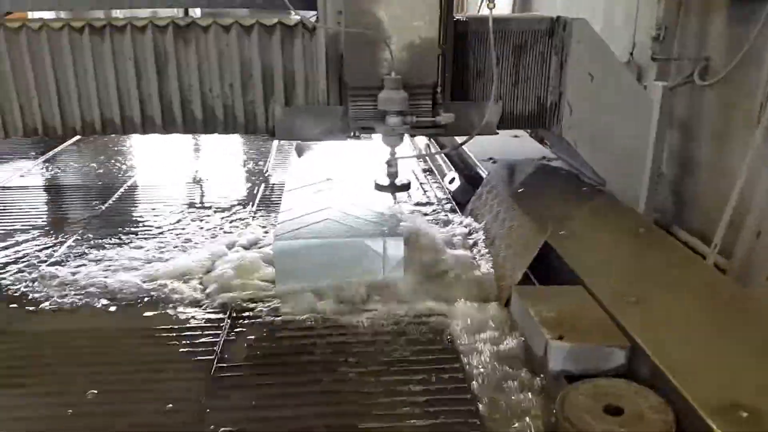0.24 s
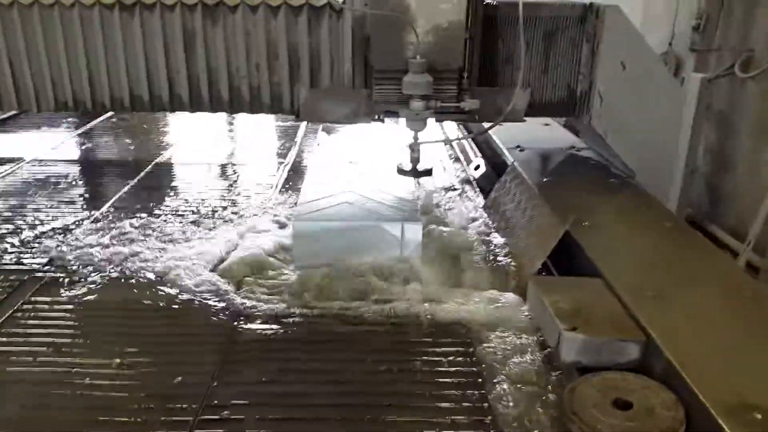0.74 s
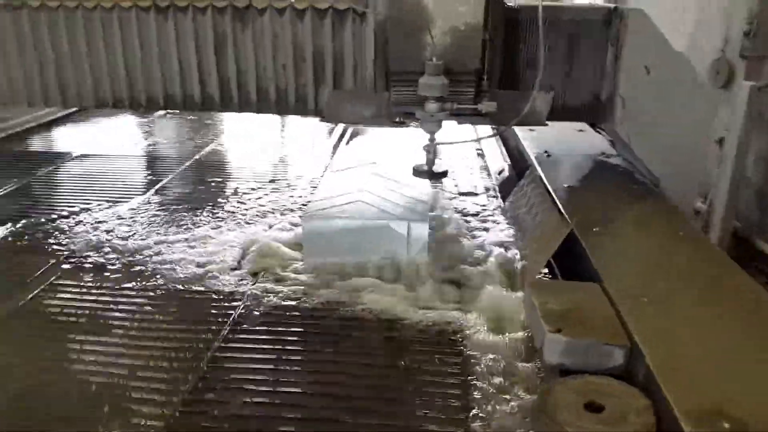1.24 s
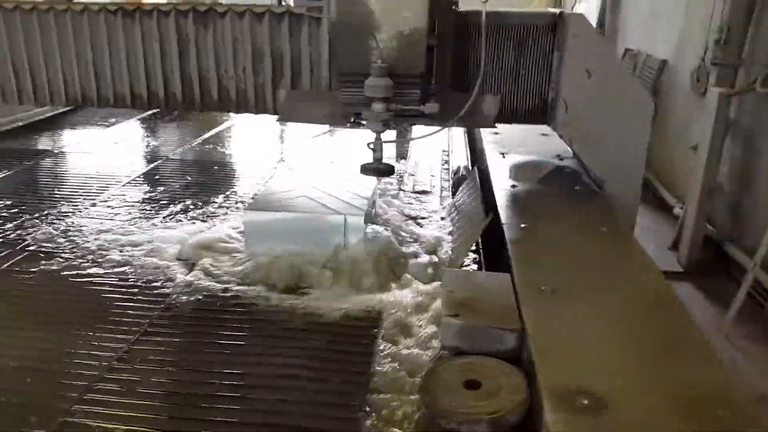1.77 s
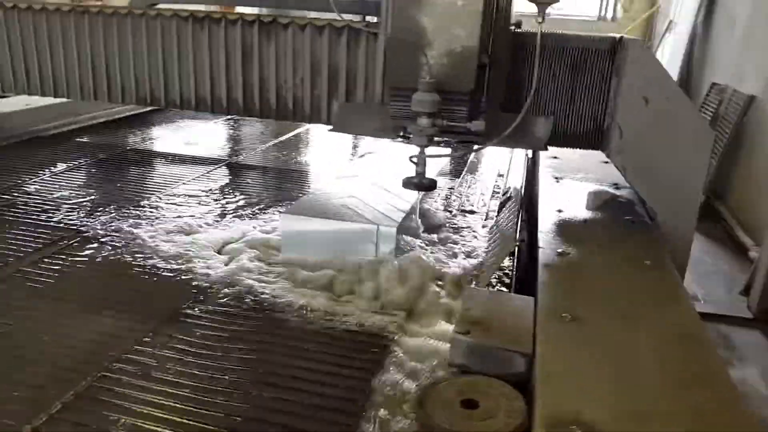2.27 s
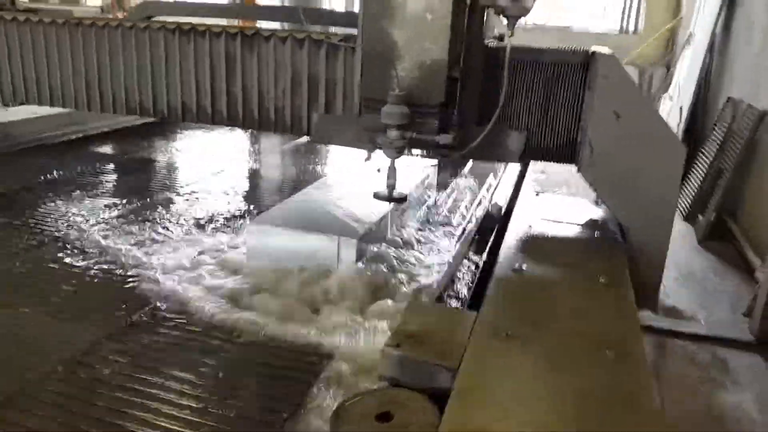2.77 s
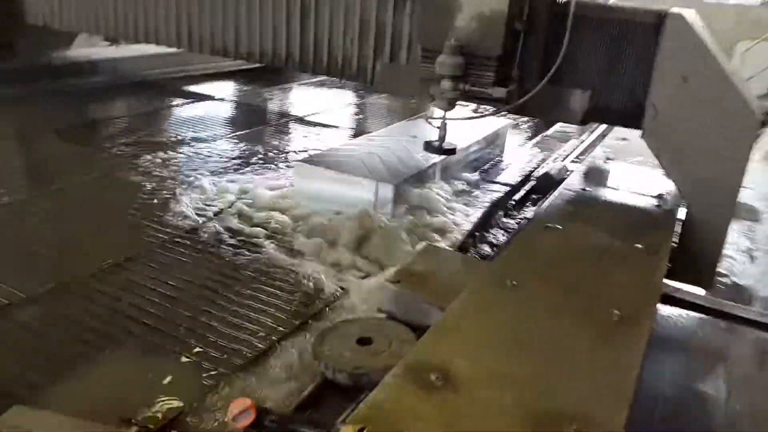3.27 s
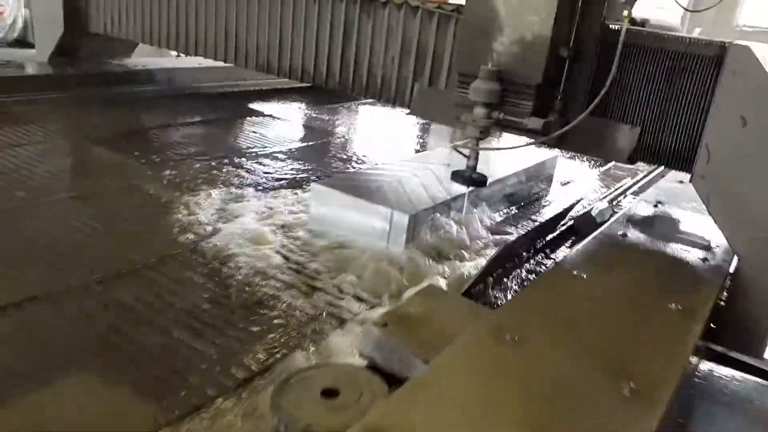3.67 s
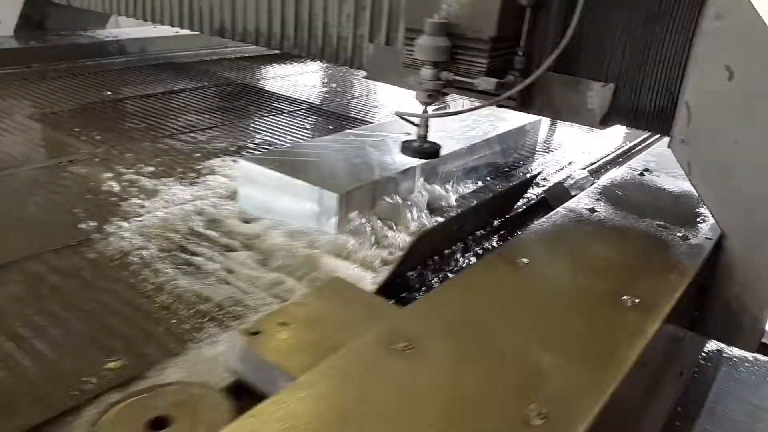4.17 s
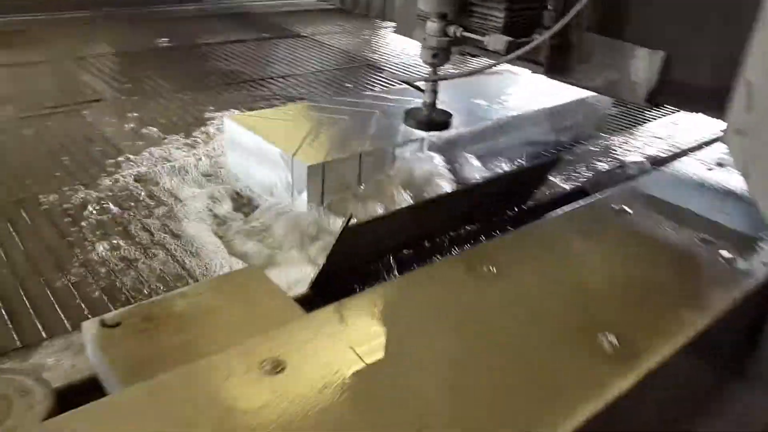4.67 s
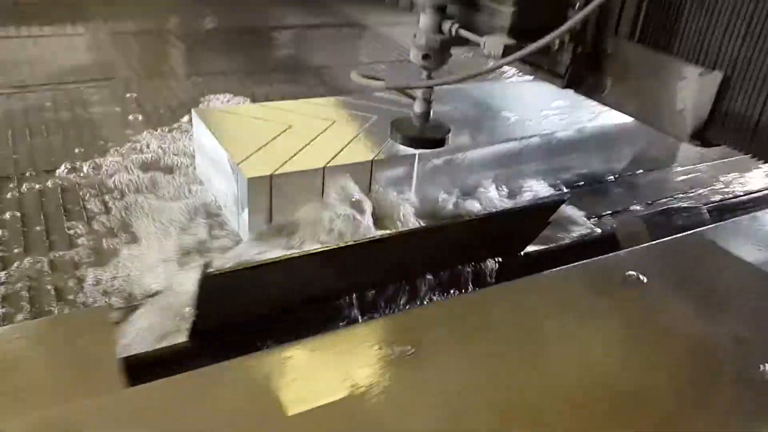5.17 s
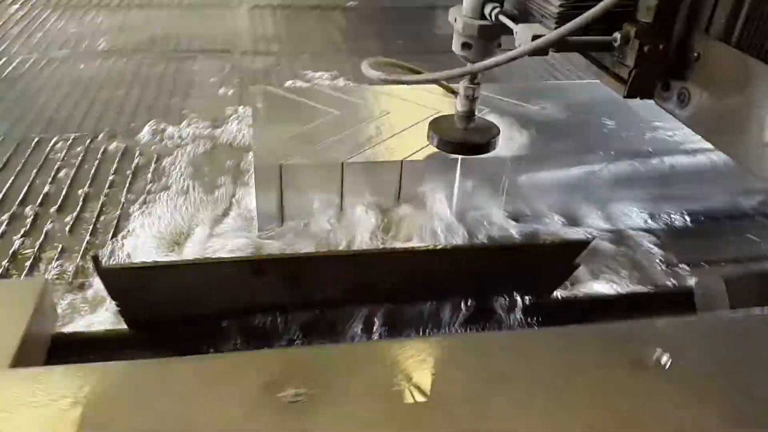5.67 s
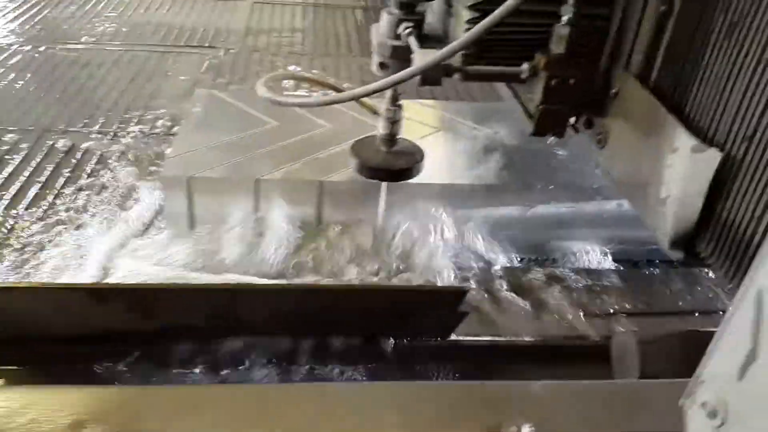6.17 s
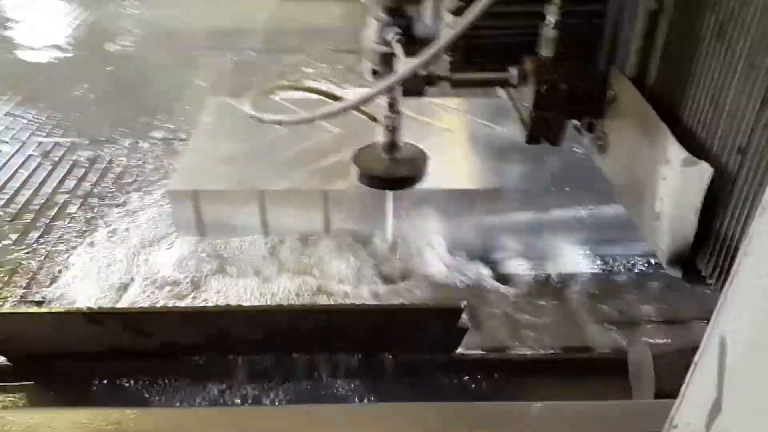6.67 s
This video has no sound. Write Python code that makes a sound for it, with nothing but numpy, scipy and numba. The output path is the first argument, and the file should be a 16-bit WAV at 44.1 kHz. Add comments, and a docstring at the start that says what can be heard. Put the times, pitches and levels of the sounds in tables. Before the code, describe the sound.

A bright, steady high-pressure waterjet hiss with bubbling froth, as air gusts thump the left microphone and later roar over both.

```python
"""First comes the bright hiss of an abrasive waterjet in a thick metal block, with a breathy tone from the cut.
The hiss is noise in flickering bands; the tone is noise in the slot's resonances; the tank's froth is ringing bubbles.
The listener walks from the tank's edge to the nozzle with a pair of microphone ports. Gusts and single eddies,
made of short pressure pulls, strike mostly the left port; then air rushes over both ports in a brighter roar.
The workshop behind is a faint low rumble."""
import sys
import numpy as np
from scipy import signal
from scipy.io import wavfile
from scipy.ndimage import uniform_filter1d, minimum_filter1d, map_coordinates
from numba import njit

SR = 44100
rng = np.random.default_rng(int(sys.argv[2]) if len(sys.argv) > 2 else 0)


def put_to_file(sound):
    """Save the sound as 16-bit audio at rate SR, in the file named by the first command-line argument."""
    columns = np.atleast_2d(sound).T  # one column per channel
    safe = np.clip(columns, -1, 1)
    whole_steps = np.round(safe * 32767)
    wavfile.write(sys.argv[1], SR, whole_steps.astype(np.int16))


N = 304731

# Relative colour of the hiss at the tank's edge: (frequency [Hz], left density [dB per Hz], right density [dB per Hz])
HISS_AT_TANK_EDGE = [(120, -29, -31), (406, -1.5, -7.5), (900, -11, -9.5), (1800, -1, -6), (2870, -5, -2.5),
                     (3930, -2, -1.3), (4480, -4, 6), (6200, -0.5, 6.5), (8330, 13, 2.5), (9650, 4.2, 7),
                     (10900, 11.5, -9.5), (12660, -4, 1), (14500, -4.5, -9), (15500, -7, -2)]
# The same beside the nozzle: (frequency [Hz], left density [dB per Hz], right density [dB per Hz])
HISS_BESIDE_NOZZLE = [(120, 10, -11), (400, -7.5, -5), (900, -5, -8.5), (1800, 2, -6.0), (2960, 5, -0.5),
                      (3700, -2.5, 0.5), (4830, -4.5, 4), (6070, -4.5, -1.5), (7970, 0.1, 0.7),
                      (8900, -4, 0.5), (10900, 0.5, -1), (11900, 8.5, 4), (13200, 7.5, -2), (16700, -6, 3)]
# Strength of the hiss: (time [s], level [dB])
HISS_LEVEL = [(0, -14.5), (.7, -12.5), (2.2, -12), (3.9, -13.5), (5.3, -13.5), (5.55, -15), (5.8, -14.5),
              (6.9, -15.5)]
# The walk towards the nozzle: (time [s], nearness [0 tank edge - 1 nozzle])
WALK = [(0, 0.42), (.8, 0.41), (2.4, 0.36), (4.2, 0.52), (4.9, 0.62), (6.2, 0.78), (6.9, 0.83)]
# Direction of the nozzle: (time [s], lag of the left port [s])
NOZZLE_BEARING = [(0, .00001), (1.6, .000055), (5.9, .00006), (6.6, .00001)]
# Air resonances of the cut slot: (frequency [Hz], width [Hz], relative level [dB])
SLOT_RESONANCES = [(1900, 580, -7.5), (6010, 540, -3)]
# How strongly the jet blows those resonances: (time [s], level [dB])
SLOT_LEVEL = [(0, -23), (.25, -18.5), (.42, -24.5), (.8, -31), (1.1, -30), (2.2, -30), (2.7, -42),
              (6.9, -49)]
# Surges of froth, about three a second, each pushing a gust at one port:
# (start [s], length [s], swell of the splash [dB], rumble of the gust [dB], port [0 left, 1 right])
FROTH_SURGES = [(0.152, .14, 4.5, -30.5, 0), (.54, .1, 3, -35, 0), (.75, .13, 2.5, -29.5, 0),
                (1.182, .14, 3, -25.5, 0), (1.377, .2, 0, -22, 0), (1.798, 0.11, 2.5, -20, 0),
                (2.0, 0.096, 0, -25, 0), (2.232, .1, 2.5, -24.5, 0), (2.449, 0.11, 2.5, -21, 0),
                (2.647, 0.076, -0.5, -19.5, 0), (2.836, 0.06, -0.5, -24, 0), (3.13, .1, 2.5, -22.5, 0),
                (3.278, .11, 3, -21, 0), (3.464, .03, -2.5, -25.5, 0), (3.65, .11, 0, -23.5, 0),
                (3.807, 0.12, 1.5, -18.5, 0), (4.116, 0.18, 3.5, -20, 0), (4.357, .19, 0, -18, 0),
                (4.708, 0.14, 1, -19.5, 0), (5.16, .06, 3, -26, 1), (5.29, 0.062, 5, -21, 1),
                (5.43, 0.065, 3.5, -27.5, 1), (6.06, .14, 4.5, -23, 1)]
# Rumble between gusts: [left [dB], right [dB]]
CALM_RUMBLE_DB = [-34.5, -41.5]
# Air speed beside the nozzle, as eddy rates: (time [s], left rate [Hz], right rate [Hz])
STREAM_EDDY_RATES = [(5.07, 560, 400), (5.14, 1100, 430), (5.55, 900, 490), (5.8, 1330, 533),
                     (6.17, 1900, 1540), (6.48, 1900, 1500), (6.62, 1046, 650), (6.76, 1800, 1800),
                     (6.9, 2180, 1900)]
# Single large eddies that thump a port: (time [s], peak level [dB], port [0 left, 1 right])
LARGE_EDDIES = [(.22, -10.5, 0), (.429, -9, 0), (.642, -12.5, 0), (0.777, -10.5, 0), (1.199, -11.5, 0),
                (1.288, -8, 0), (1.388, -5, 0), (1.432, -7, 0), (1.553, -14, 0), (2.008, -8, 0),
                (2.323, -15, 0), (2.365, -9, 0), (2.46, -10, 0), (2.707, -10, 0), (2.882, -9, 0),
                (2.934, -6.5, 0), (2.957, -4, 0), (3.066, -10, 0), (3.295, -8, 0), (3.38, -8, 0),
                (3.469, -9, 0), (3.705, -10, 0), (3.885, -15, 1), (4.231, -8.5, 1), (4.483, -11, 1),
                (4.525, -11, 1), (5.08, -4, 0), (5.147, -17, 1), (5.31, -15, 1)]

# Random level changes in each band of the hiss, slow to fast
WANDER_DB, PATCHY_DB, SPUTTER_DB = .5, 1.1, .55
SURGE_SHARE = .7    # share of the splash swell, in dB, that reaches the lowest hiss
DIRECT_SHARE = .22  # share of hiss power that takes the straight path
FROTH_DB, FROTH_RIGHT_DB, BUBBLES_PER_S = -25, -6.5, 2500   # the right side is relative to the left
FROTH_LOW_HZ, FROTH_HIGH_HZ = 712, 4090
USUAL_SPLASH_DB, SWELL_SPREAD_S = -3, .042   # a swell reaches this far beyond its gust
GUST_ATTACK_S, GUST_RELEASE_S = .042, .05    # time to rise and to fall by 10 dB
GUST_EDDY_HZ, GUST_REFERENCE_DB = 490, -19.5  # eddy rate of a gust at this level
EDDY_FOLLOWS = .5   # share of the gust's swing, in dB, that the eddy rate follows
# Steady air beside the nozzle, [left, right]; the level is that of slow air
STREAM_ENTRY_S, STREAM_DB = [5.1, 5.64], [-17.5, -18]
STREAM_THINS_HZ, STREAM_SPLASH_DB = 1670, 3  # faster eddies rumble less; the nearby splash is louder
LOW_CUT_HZ, PORT_TOP_HZ, PORT_LEAK_DB = 88, 3470, -37
HALL_DB, HALL_BAND_HZ = -52, [65, 240]
CUTOFF_HZ = 15850


def from_db(db):
    """Decibels to amplitude gain."""
    return 10 ** (np.asarray(db) / 20)


def rms_one(x):
    """Scale to rms 1."""
    return x / np.sqrt(np.mean(x ** 2) + 1e-20)


def in_time(rows):
    """Each column of a curve, read at every sample."""
    times, *columns = np.transpose(rows)
    return [np.interp(np.arange(N) / SR, times, column) for column in columns]


def at_hz(rows, hz):
    """Each column of a spectrum at one frequency, as a column vector."""
    points, *columns = np.transpose(rows)
    return np.array([[np.interp(np.log(hz), np.log(points), column)] for column in columns])


def butter(x, hz, kind, order=2):
    """Causal Butterworth filter."""
    sections = signal.butter(order, np.clip(hz, 10, .45 * SR), kind, fs=SR, output="sos")
    return signal.sosfilt(sections, x + 1e-18)


def drift(rate_hz):
    """Slow random curve with rms 1: low-passed noise, computed at every 40th sample."""
    r = np.exp(-80 * np.pi * rate_hz / SR)
    noise = rng.standard_normal(N // 40 + 2002)
    slow = signal.lfilter([1], [1, -2 * r, r * r], noise)[2000:]   # drop the filter's start
    return np.interp(np.arange(N) / 40, np.arange(len(slow)), rms_one(slow))


def resonance(x, hz, width_hz):
    """Two-pole resonance with gain 1 on top."""
    r = np.exp(-np.pi * width_hz / SR)
    zeros = np.array([1, 0, -1]) * (1 - r * r) / 2
    poles = [1, -2 * r * np.cos(2 * np.pi * hz / SR), r * r]
    return signal.lfilter(zeros, poles, x + 1e-18)


@njit
def smear(x, keep):
    """One-pole low-pass whose memory changes from sample to sample."""
    out, state = np.empty(len(x)), 0.
    for i in range(len(x)):
        state = keep[i] * state + (1 - keep[i]) * x[i]
        out[i] = state
    return out


def delayed(x, lag_s):
    """Sound arriving late by a lag that may change with distance."""
    return map_coordinates(x, [np.arange(N) - lag_s * SR], order=3, mode="mirror")


def jet(surge_db, spray_top_hz=5000):
    """Turbulent hiss: noise bands that flicker, with a colour that changes on the way to the nozzle."""
    (level_db,), (near,) = in_time(HISS_LEVEL), in_time(WALK)
    edges = np.geomspace(1260, 17700, 25) - 1200
    direct, diffuse = 0, 0
    for low, high in zip(edges, edges[1:]):
        hz = np.sqrt(low * high)
        noise = butter(rng.standard_normal((3, N)), [low, high], "band")
        colour_db = (1 - near) * at_hz(HISS_AT_TANK_EDGE, hz) + near * at_hz(HISS_BESIDE_NOZZLE, hz)
        # the lower bands are spray hitting the water, and swell with the froth
        spray_db = SURGE_SHARE * surge_db / (1 + (hz / spray_top_hz) ** 2)
        flicker_db = WANDER_DB * drift(3.4) + PATCHY_DB * drift(13) + SPUTTER_DB * drift(32)
        gain = from_db(colour_db + spray_db + flicker_db)
        direct = direct + gain * noise[0]
        diffuse = diffuse + gain * noise[1:]
    # the straight path is shared by both ports; the rest comes from all over the workshop
    left_lag_s = in_time(NOZZLE_BEARING)[0]
    direct = np.array([delayed(direct[0], left_lag_s), direct[1]])
    hiss = np.sqrt(DIRECT_SHARE) * direct + np.sqrt(1 - DIRECT_SHARE) * diffuse
    hiss = np.array([reflections(side) for side in hiss])
    treble = butter(hiss, [6000, 15500], "band")   # the level refers to this band
    return from_db(level_db) * hiss / np.std(treble)


def reflections(x, echo_db=-18, sway_s=.0001, count=7):
    """Water and steel nearby throw the hiss back; the hollow colour wanders as the listener moves."""
    lags = np.geomspace(.0009, .008, count) * rng.uniform(.93, 1.07, count)
    echoes = sum(delayed(x, lag + sway_s * drift(.54)) for lag in lags)
    return x + from_db(echo_db) * echoes


def kerf():
    """The jet blows across the slot that it has cut: noise excites the slot's air resonances."""
    air = rng.standard_normal((2, N))
    voiced = 0
    for hz, width_hz, db in SLOT_RESONANCES:
        once = resonance(air, hz, width_hz)
        voiced = voiced + from_db(db) * rms_one(resonance(once, hz, width_hz))
    return from_db(in_time(SLOT_LEVEL)[0]) * rms_one(voiced)


def gust_shape(start_s, end_s):
    """Attack, hold and release of a gust, in dB below its top."""
    t = np.arange(N) / SR
    before, after = np.maximum(start_s - t, 0), np.maximum(t - end_s, 0)
    return -10 * np.minimum(before / GUST_ATTACK_S + after / GUST_RELEASE_S, 10)


def airflow(port):
    """Rumble in dB and eddy rate in Hz at one port: calm air, then gusts, then the steady stream."""
    gust_db = np.full(N, float(CALM_RUMBLE_DB[port]))
    for start, length, _, db, side in FROTH_SURGES:
        if int(side > .5) == port:
            gust_db = np.maximum(gust_db, db + gust_shape(start, start + length))
    # a strong gust is fast air, so it is brighter as well as louder
    gust_hz = GUST_EDDY_HZ * from_db(EDDY_FOLLOWS * (gust_db - GUST_REFERENCE_DB))
    stream_hz = in_time(STREAM_EDDY_RATES)[port]
    thinning_db = 10 * np.log10(1 + (stream_hz / STREAM_THINS_HZ) ** 3)
    stream_db = STREAM_DB[port] + gust_shape(STREAM_ENTRY_S[port], N / SR) - thinning_db
    return np.maximum(gust_db, stream_db), np.where(stream_db > gust_db, stream_hz, gust_hz)


def draught(level_db, eddy_hz, crowding=.7, size_spread_db=.5, small_db=-8, lumpy_db=1.45,
            steady_s=.0485, rebound_hz=160, fast_hz=2100):
    """Eddies push and, more often, suck at one port; in fast air they are short and crowd into a roar."""
    pressure = 0
    for scale, db in [(.5, 0), (2, small_db)]:   # large and small eddies
        # birth rate and brevity both follow the air speed
        born = rng.random(N) < crowding * scale * eddy_hz / SR
        sizes = from_db(size_spread_db * np.minimum(rng.exponential(1, N), 3))
        pulls = born * (sizes * rng.choice([-1, -1, 1], N))
        keep = np.exp(-2 * np.pi * 2 * scale * eddy_hz / SR)
        rounded = smear(smear(pulls + 1e-18, keep), keep)
        pressure = pressure + from_db(db) * rounded / np.sqrt(scale)
    # the pressure recovers behind each eddy, so fast air carries little bass
    recover = np.exp(-2 * np.pi * rebound_hz * (eddy_hz / fast_hz) / SR)
    for _ in range(2):
        pressure = pressure - smear(pressure, recover)
    pressure = butter(butter(pressure, LOW_CUT_HZ, "high"), PORT_TOP_HZ, "low")
    # even out the rumble's power, then give it the strength of the draught
    power = uniform_filter1d(butter(pressure, [50, 700], "band") ** 2, int(steady_s * SR))
    even = pressure / np.sqrt(power + .014 * np.median(power))
    return even * from_db(level_db + lumpy_db * drift(34))


def thumps(eddy_hz=130):
    """A large eddy is one pull of a few milliseconds at a port, with a rebound."""
    pulls = np.zeros((2, N))
    for s, db, port in LARGE_EDDIES:
        pulls[int(port > .5), round(s * SR)] -= from_db(db)
    age = 2 * np.pi * eddy_hz * np.arange(SR // 20) / SR
    shape = butter(age ** 2 * np.exp(-2 * age), LOW_CUT_HZ, "high", order=1)
    return signal.oaconvolve(pulls, shape[None] / shape.max())[:, :N]


def splash():
    """Splash level in dB: a rounded swell for each surge, and a lasting rise beside the nozzle."""
    t = np.arange(N) / SR
    swells_db = 0
    for start, length, db, _, _ in FROTH_SURGES:
        from_middle = (t - start - length / 2) / (length / 2 + SWELL_SPREAD_S)
        swells_db = swells_db + db * np.exp(-from_middle ** 2)
    rise_db = STREAM_SPLASH_DB * from_db(gust_shape(STREAM_ENTRY_S[1], N / SR))
    return USUAL_SPLASH_DB + swells_db + rise_db


def froth(surge_db, size_spread_db=3.5, sharpness=14, count=16):
    """Small bubbles burst at random, each ringing for a few cycles at one of several pitches."""
    sizes = from_db(size_spread_db * np.minimum(rng.exponential(1, N), 4)) * rng.choice([-1, 1], N)
    bursts = sizes * (rng.random(N) < BUBBLES_PER_S / SR)
    dealt = rng.integers(0, count, N)   # which pitch each bubble gets
    pitches = np.geomspace(FROTH_LOW_HZ, FROTH_HIGH_HZ, count)
    rings = sum(resonance(bursts * (dealt == k), hz, hz / sharpness) for k, hz in enumerate(pitches))
    return from_db(FROTH_DB + surge_db) * rms_one(rings)


def hall():
    """The tank and the machines of the workshop rumble faintly: low band-passed noise."""
    noise = rng.standard_normal((2, N))
    return from_db(HALL_DB) * rms_one(butter(noise, HALL_BAND_HZ, "band", order=1))


def scene():
    """Jet and froth reach both sides; each port has its own eddies, felt faintly at the other."""
    surge_db = splash()
    wind = np.array([draught(*airflow(port)) for port in range(2)]) + thumps()
    leak = from_db(PORT_LEAK_DB) * wind[::-1]
    water = np.array([froth(surge_db), from_db(FROTH_RIGHT_DB) * froth(surge_db)])
    return jet(surge_db) + kerf() + wind + leak + water + hall()


def record(dry):
    """The deepest bass is dropped, a fast limiter holds the peaks, and the top is cut steeply."""
    sound = butter(dry, 72, "high")
    peak_gain = np.minimum(1, .92 / (np.abs(sound) + 1e-9))
    gain = uniform_filter1d(minimum_filter1d(peak_gain, size=15), size=15)
    top_cut = signal.ellip(14, .1, 90, CUTOFF_HZ, fs=SR, output="sos")
    return signal.sosfilt(top_cut, sound * gain)


dry = scene()
out = record(dry)
put_to_file(out)
```